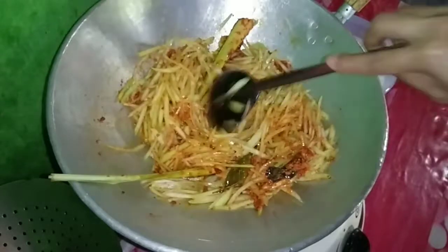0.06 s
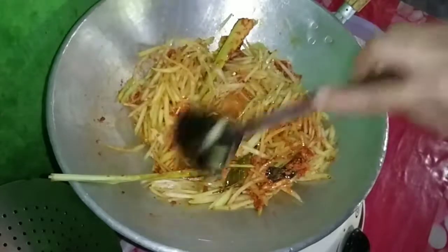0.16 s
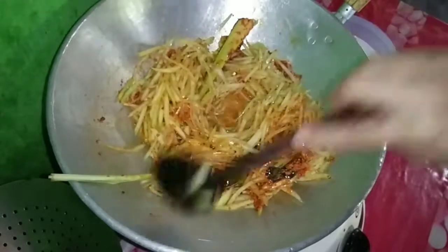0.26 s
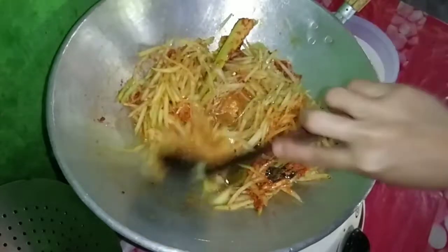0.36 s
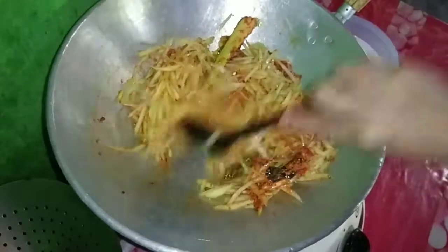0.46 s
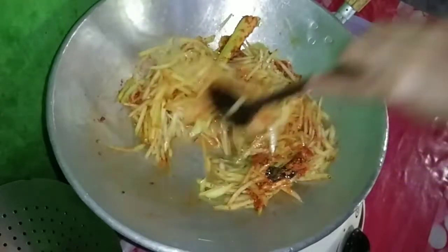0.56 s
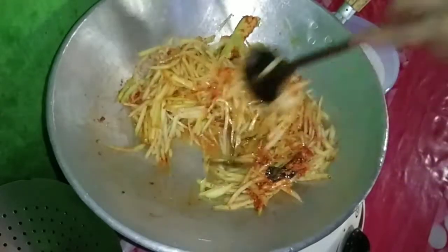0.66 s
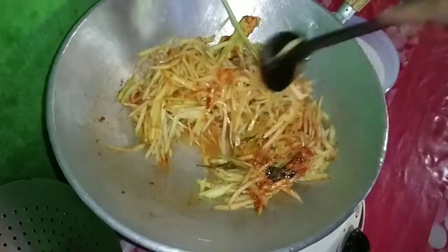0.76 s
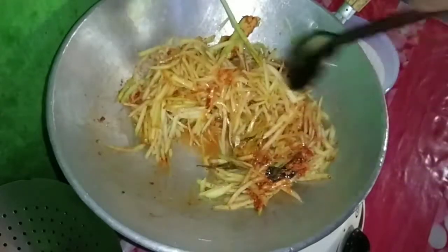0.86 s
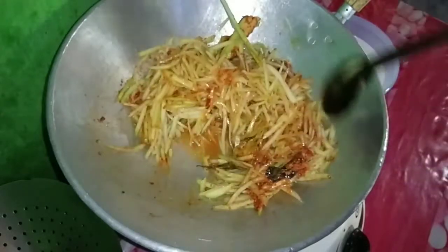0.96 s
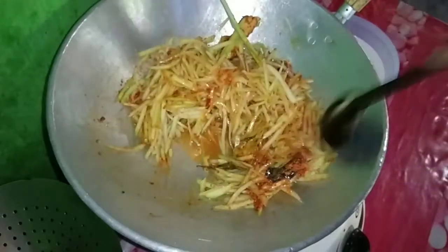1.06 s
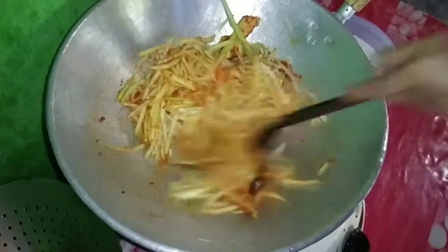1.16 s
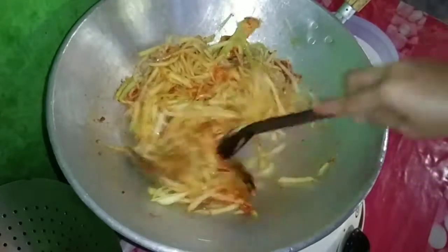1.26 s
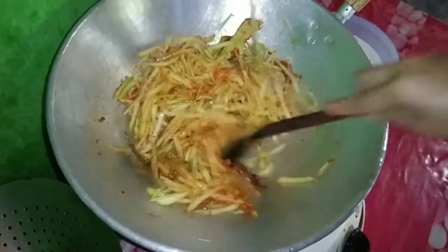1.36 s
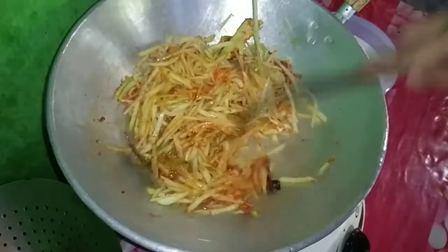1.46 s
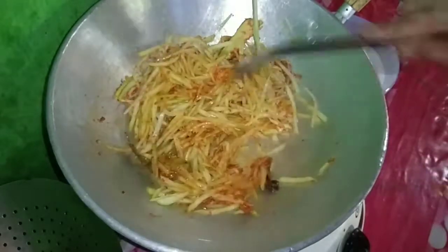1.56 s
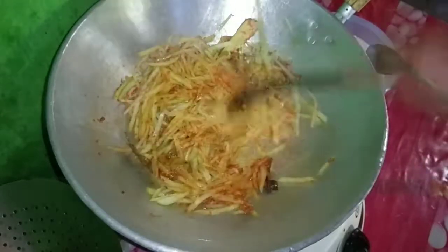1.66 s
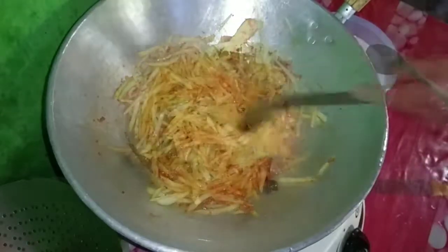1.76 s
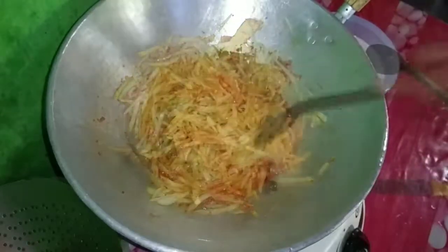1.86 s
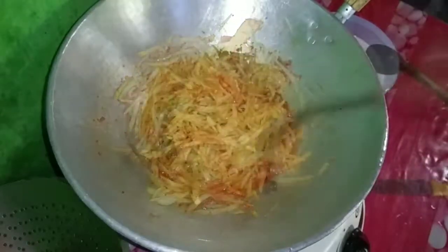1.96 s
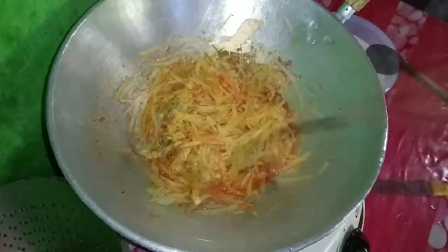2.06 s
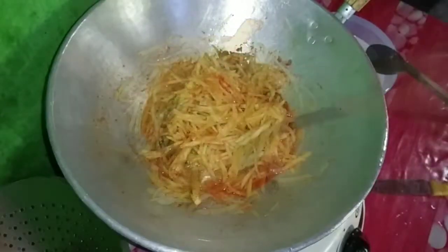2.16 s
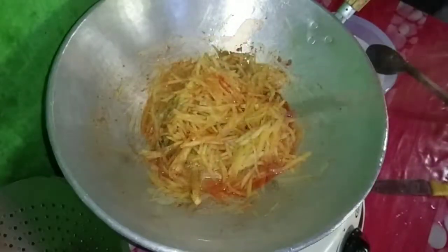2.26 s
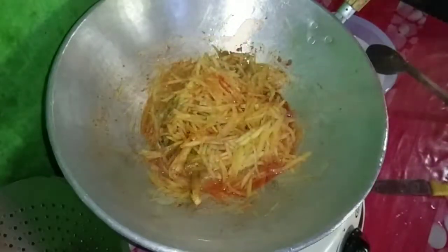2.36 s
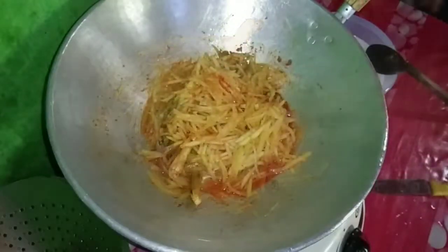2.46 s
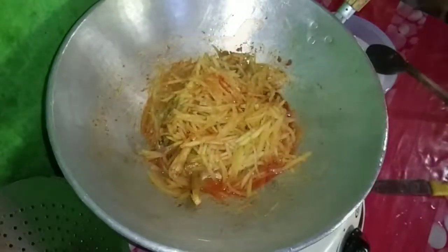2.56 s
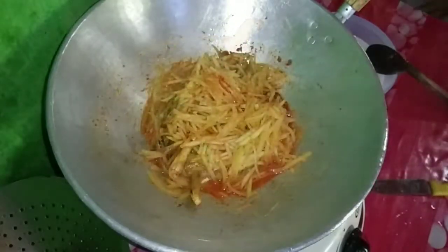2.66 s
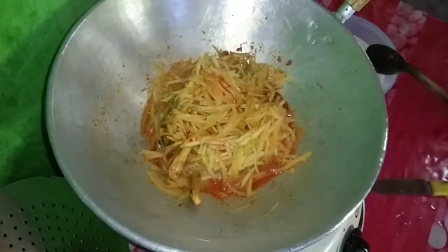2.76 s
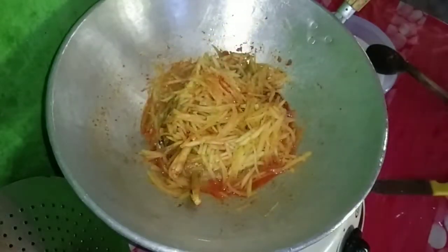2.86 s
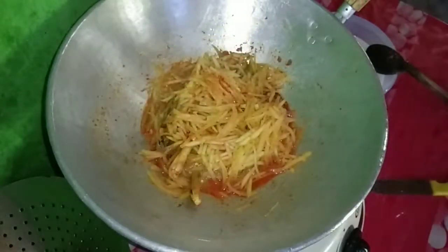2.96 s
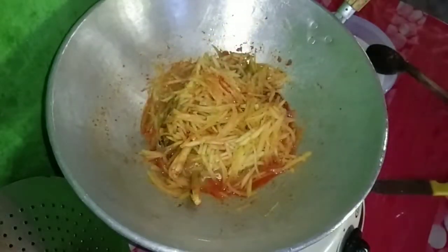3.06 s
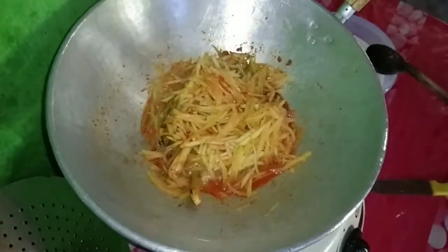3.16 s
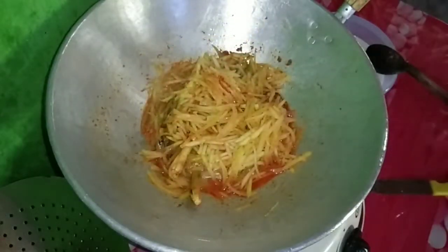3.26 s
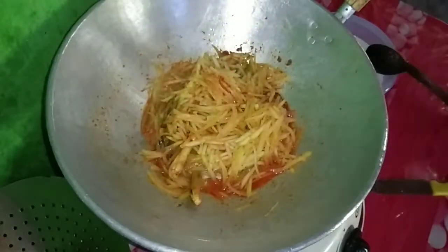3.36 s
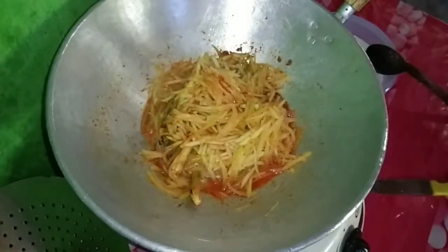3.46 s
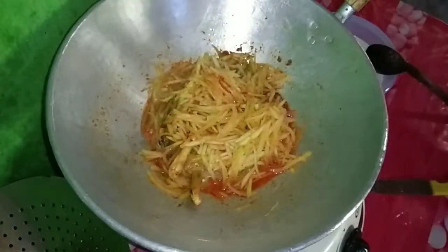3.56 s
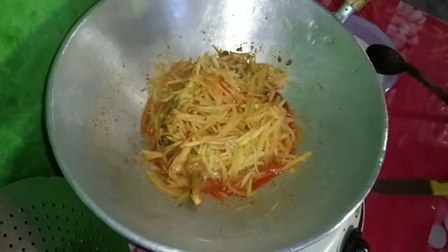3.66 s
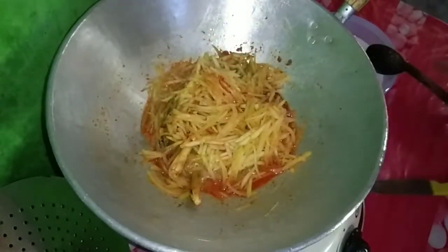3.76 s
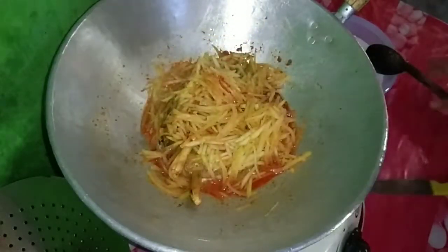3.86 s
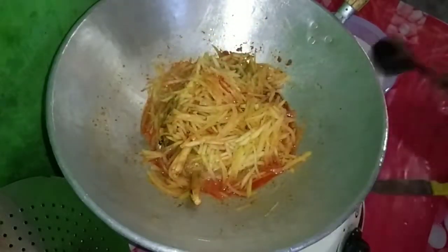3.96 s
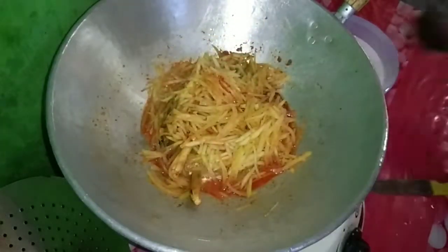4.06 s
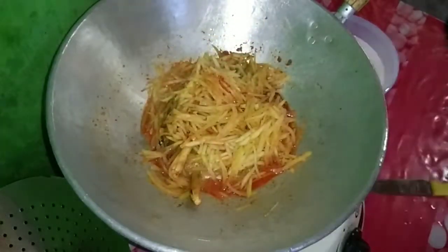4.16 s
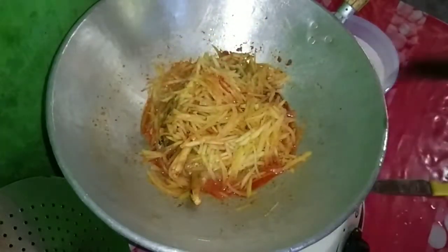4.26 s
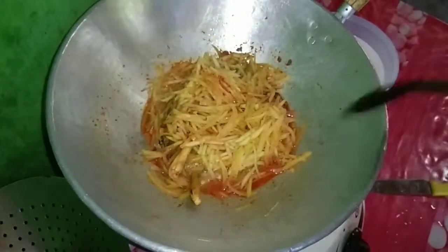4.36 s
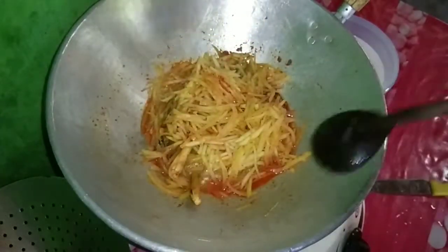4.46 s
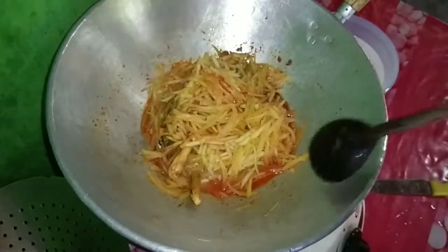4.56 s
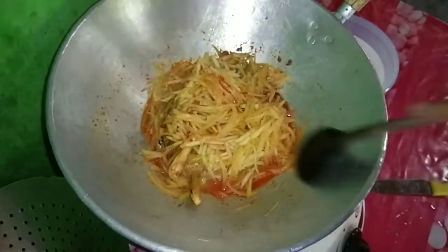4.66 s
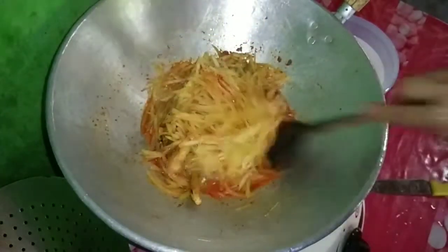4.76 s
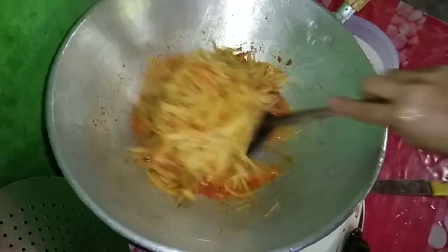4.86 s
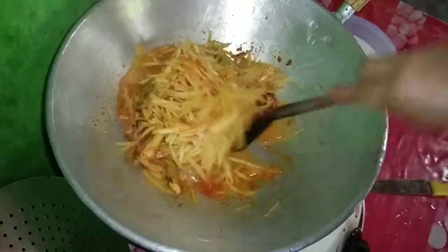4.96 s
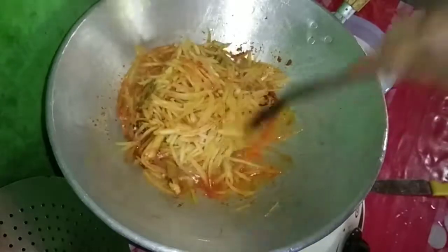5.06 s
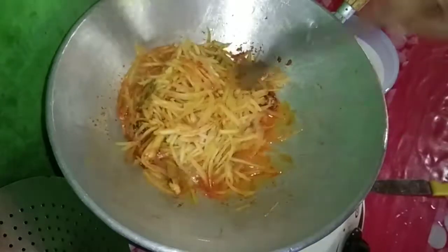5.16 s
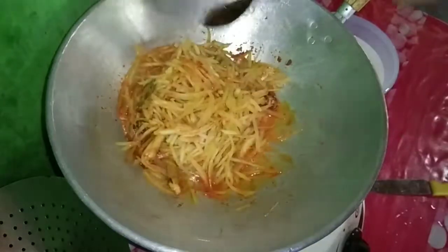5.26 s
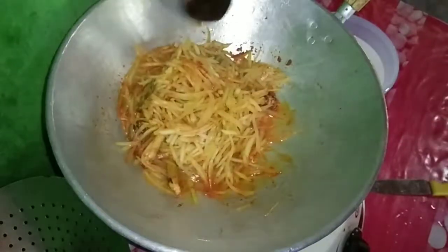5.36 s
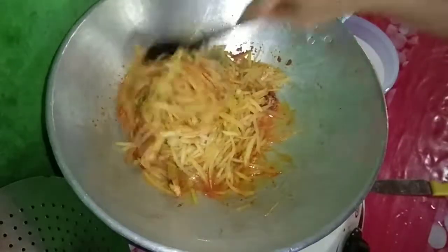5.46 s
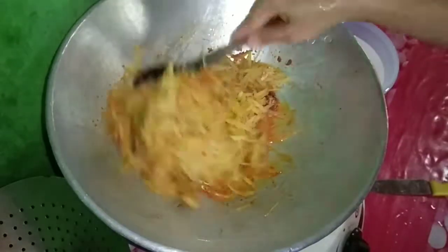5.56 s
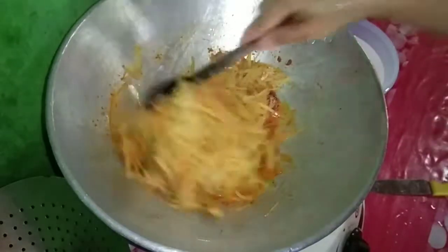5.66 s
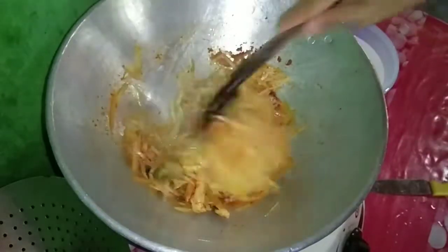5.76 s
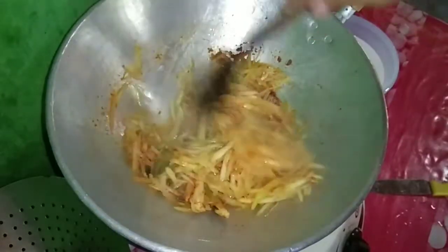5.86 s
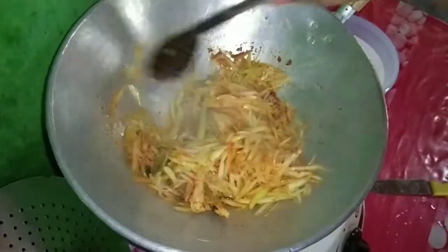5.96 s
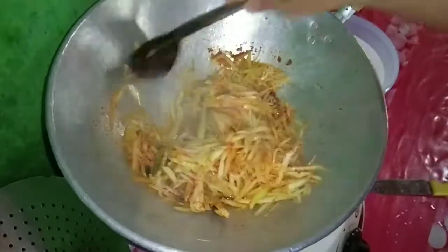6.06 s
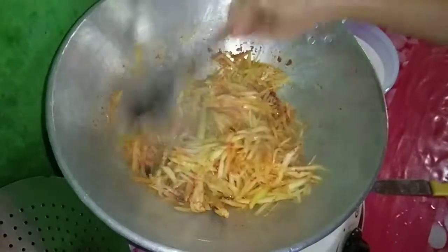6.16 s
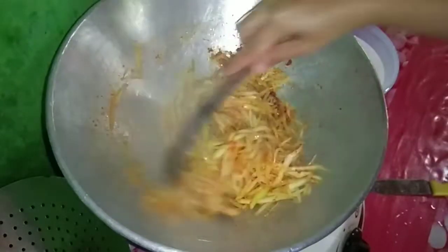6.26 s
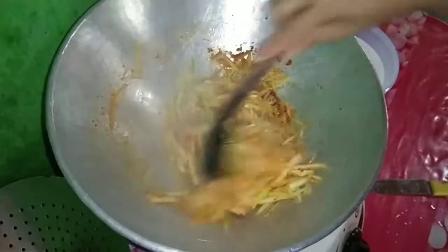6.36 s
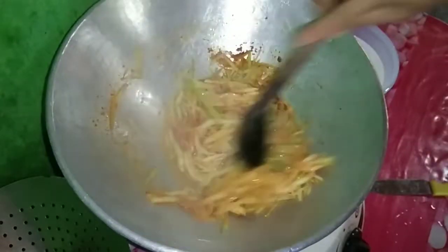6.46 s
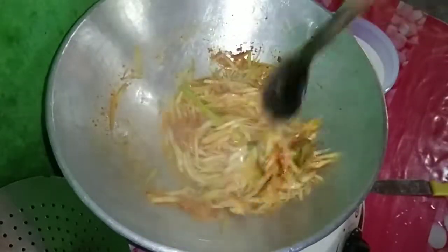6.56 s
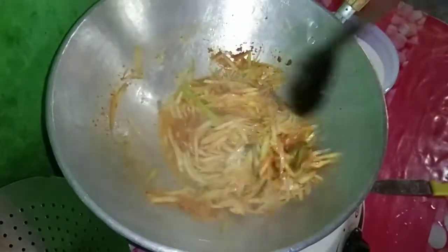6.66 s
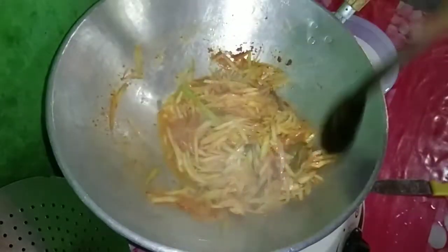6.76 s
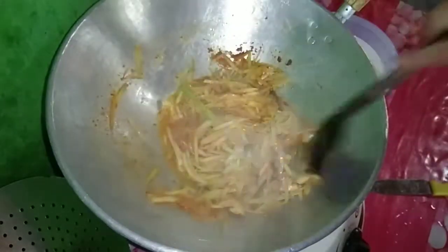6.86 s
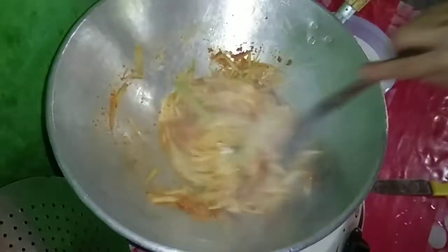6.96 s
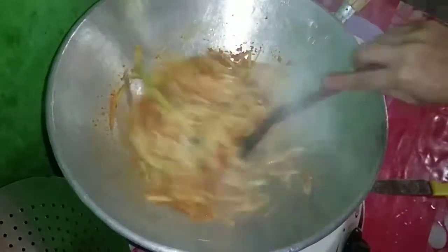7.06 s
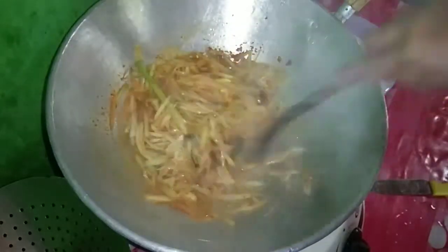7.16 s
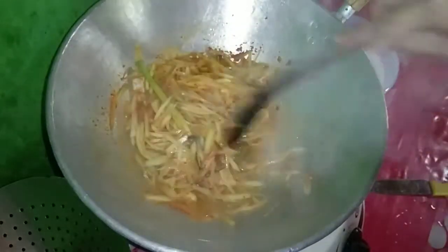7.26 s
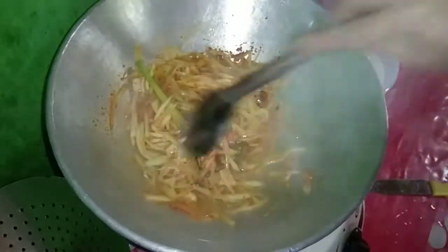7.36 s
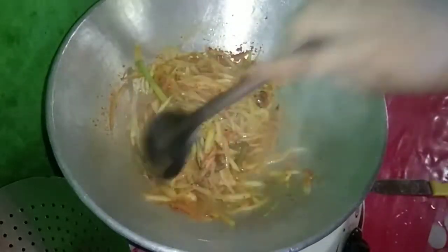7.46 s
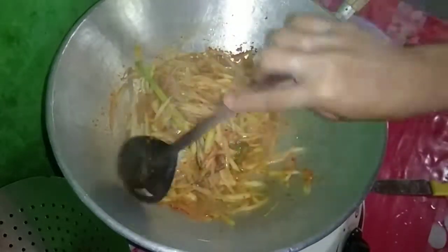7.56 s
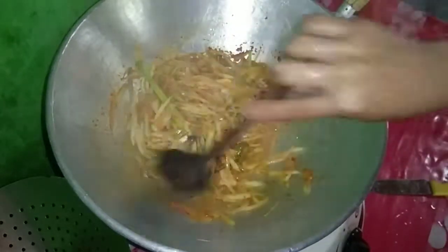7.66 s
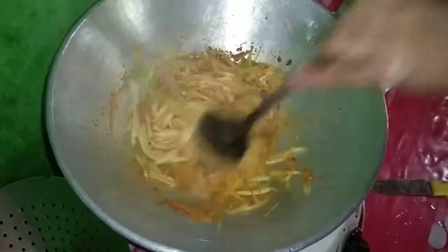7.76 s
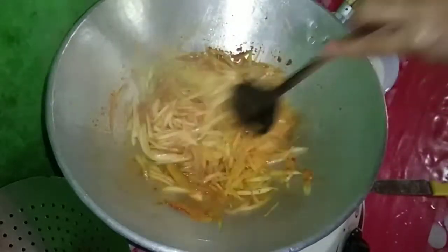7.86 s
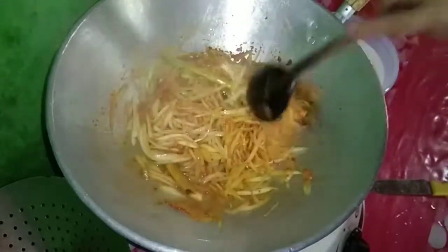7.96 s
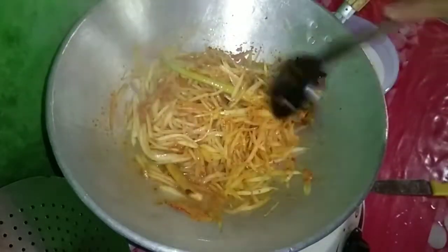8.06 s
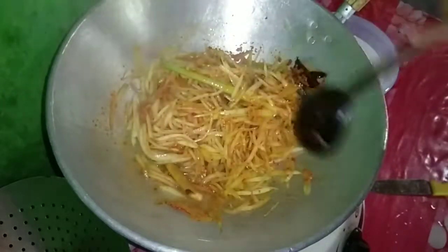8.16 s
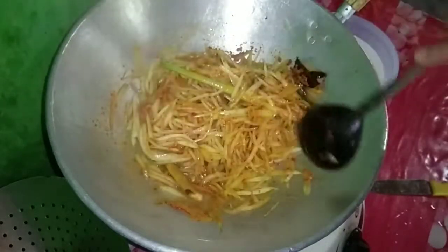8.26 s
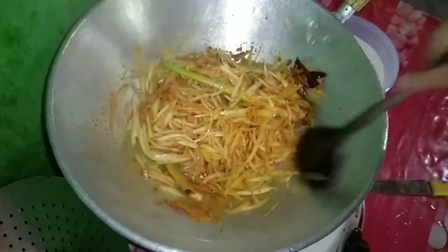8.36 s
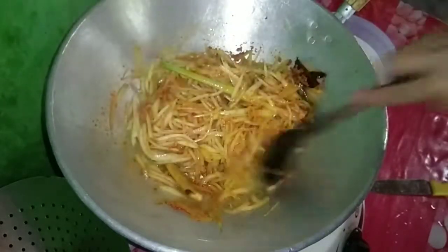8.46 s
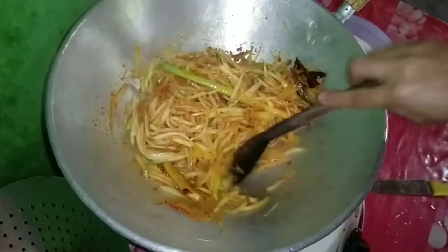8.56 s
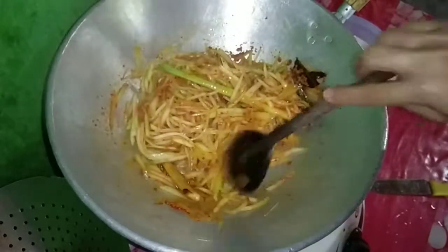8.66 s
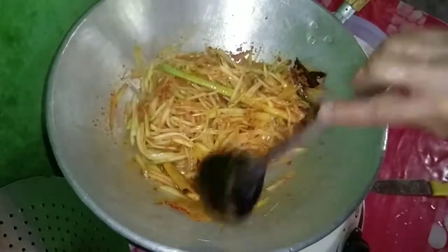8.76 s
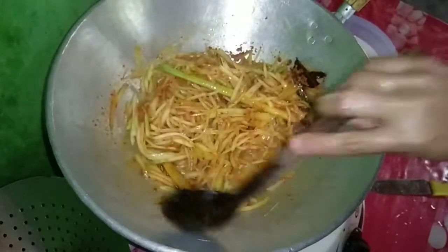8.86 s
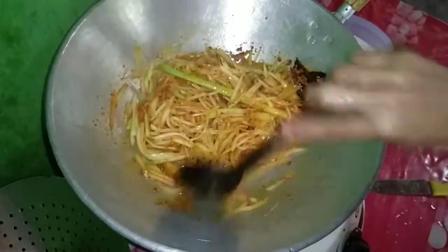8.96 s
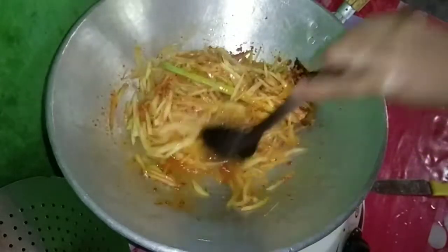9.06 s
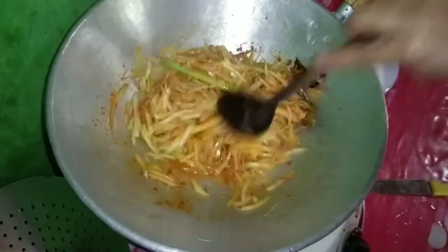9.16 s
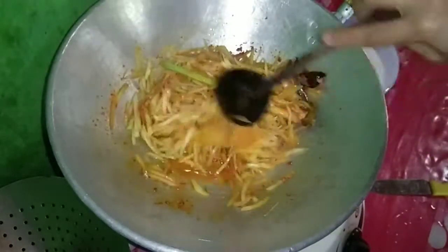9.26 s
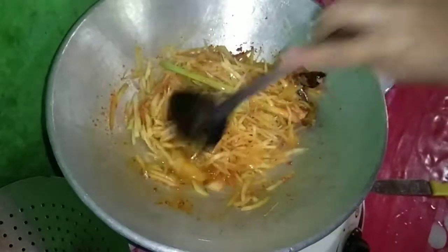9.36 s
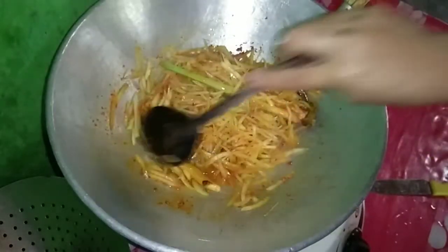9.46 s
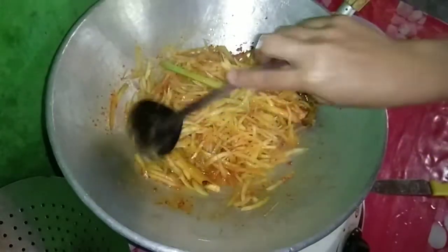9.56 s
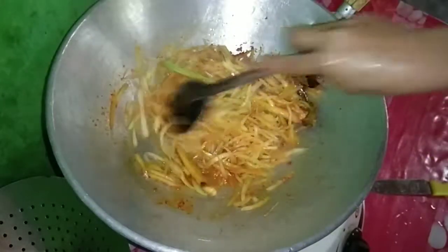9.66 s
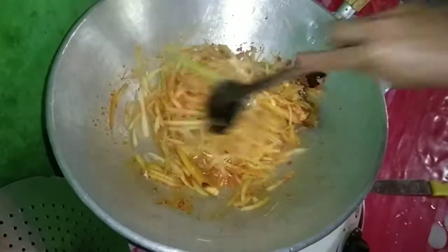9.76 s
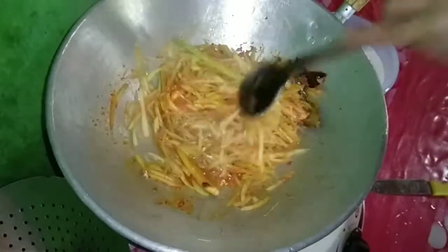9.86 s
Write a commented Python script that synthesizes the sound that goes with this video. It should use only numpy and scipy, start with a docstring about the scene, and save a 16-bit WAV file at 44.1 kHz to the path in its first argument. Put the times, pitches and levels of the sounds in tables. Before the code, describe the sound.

Food sizzles in a thin metal wok as a ladle knocks and scrapes, while crickets chirp steadily outside over faint traffic rumble.

```python
"""Sauce sizzles in a thin metal wok over far traffic, while crickets outside chirp in step. A ladle soon knocks
and scrapes: contacts ring the wok's modes, strokes excite them with stuttering noise. The sizzle, dense clicks
and noise, fades out by 3 s; noise puffs then pop. Chirps are short falling tones. A broad noise rushes over the
rumble, swelling near 5 s as the ladle scrapes through food. From 5.8 s an idling motor hums as three sine
multiples of its firing rate."""
import sys
import numpy as np
from scipy import signal
from scipy.fft import rfft, irfft, next_fast_len
from scipy.io import wavfile
from scipy.ndimage import uniform_filter1d, map_coordinates

SR = 44100
rng = np.random.default_rng(int(sys.argv[2]) if len(sys.argv) > 2 else 0)


def inscribe(sig):
    """Save sig as 16-bit PCM at rate SR to the path in sys.argv[1].

    A 1-D sig is mono; a 2-D sig holds one channel per row.
    Samples are clipped to [-1, 1] before scaling.
    """
    pcm = np.round(np.clip(np.atleast_2d(sig).T, -1, 1) * 32767)
    wavfile.write(sys.argv[1], SR, pcm.astype(np.int16))


N = 436149
TIME = np.arange(N) / SR


def amp(db):
    """Gain of a level in dB."""
    return 10 ** (np.asarray(db) / 20)


def unit(x):
    """x at rms 1."""
    return x / np.sqrt(np.mean(x ** 2) + 1e-20)


def curves(rows, outside=-150):
    """One value per sample for each column after the time; `outside` beyond the rows."""
    s, *cols = np.transpose(rows)
    return np.array([np.interp(TIME, s, c, outside, outside) for c in cols])


def wobble(rate_hz):
    """Smooth random curve, rate_hz knots a second."""
    return map_coordinates(rng.standard_normal(int(N * rate_hz / SR) + 4), [TIME * rate_hz])


def filtered(x, response):
    """x times a response of frequency."""
    m = next_fast_len(N + SR // 2)
    return irfft(rfft(x, m) * response(np.fft.rfftfreq(m, 1 / SR)), m)[..., :N]


def coloured(x, points):
    """x shaped by (frequency [Hz], level [dB]) points on a log axis, at rms 1."""
    f, db = np.transpose(points)
    return unit(filtered(x, lambda hz: amp(np.interp(np.log(hz + 1), np.log(f + 1), db))))


def grainy(per_s, spread_db, smooth):
    """Random clicks of uneven size at rms 1, plus noise at rms `smooth`."""
    hits = rng.random(N) < per_s / SR
    clicks = hits * rng.uniform(-0.79, 1, N) * amp(spread_db * rng.random(N) ** 2)
    return unit(clicks) + smooth * rng.standard_normal(N)


def ringing(modes, damping):
    """Response of resonant modes with alternating signs; damping scales their bandwidths."""
    def response(f):
        total = 0
        for k, (mode_hz, db, t60_s) in enumerate(modes):
            width_hz = damping * np.log(1000) / (np.pi * t60_s)
            resonance = 1j * f * np.sqrt(width_hz) / (mode_hz ** 2 - f * f + 1j * f * width_hz)
            total = total + (-1) ** k * amp(db) * resonance
        return total
    return response


# wok modes: (frequency [Hz], relative level [dB], t60 before damping [s])
WOK_MODES = [(192.7, -4.5, 0.54), (242, -14, 0.59), (333.8, -26.5, 1), (355.4, 1.5, 0.11), (456, -4, 0.089),
             (593.5, -12, 0.55), (663, -19.5, 1), (842, -4.5, 0.33), (1012, -15, 0.086), (1474, -8.5, 0.1),
             (1834, -1, 0.025), (2370, -9, 0.098), (2812, 3.5, 0.07), (2820, 2, 0.11), (2993, 7, 0.084),
             (3180, 4, 0.2), (3365, 0.5, 0.2), (3790, 7.5, 0.11), (3690, 14, 0.029), (4050, -9.5, 0.11),
             (4360, 11.5, 0.019), (4440, -2, 0.21), (4744, 12, 0.035), (5540, -8, 0.18), (5460, 7, 0.044),
             (5945, 15.5, 0.024), (7420, 6, 0.081)]
# sauce: (time [s], sizzle level [dB], fine spray level before trim [dB])
SAUCE_LEVELS = [(0.0, -43.5, -54.5), (1.08, -39.5, -56), (2.07, -52, -60.5), (3.0, -63.5, -83)]
# sizzle spectrum: (frequency [Hz], relative density [dB per Hz])
SIZZLE_SPECTRUM = [(180, -27), (300, -6.5), (609, -62), (725, -79), (887, -8), (1290, -4), (1780, -13),
                   (1990, -5.5), (3120, -6.5), (3660, 1), (4050, -2.5), (4820, -1.5), (5560, -3.5),
                   (6810, 4.5), (9500, -17.5), (12400, -35.5), (20900, -120)]
# fine spray spectrum: (frequency [Hz], relative density [dB per Hz])
SPRAY_SPECTRUM = [(4710, -48), (8000, -24), (8820, -17), (11400, -19.5), (14900, -13), (15600, -7)]


def sauce():
    """Dense tiny bursts of steam; the hot wok rings along and colours them."""
    sizzle_db, spray_db = curves(SAUCE_LEVELS)
    bursts = amp(0.5 * wobble(12)) * grainy(per_s=1200.0, spread_db=8.0, smooth=1.8)
    high_modes = [m for m in WOK_MODES if m[0] > 2500]
    shell = unit(filtered(bursts, ringing(high_modes, damping=2.0)))
    sizzle = amp(sizzle_db) * (coloured(bursts, SIZZLE_SPECTRUM) + 0.055 * shell)
    spray = amp(spray_db - 0.5) * coloured(bursts, SPRAY_SPECTRUM)
    return sizzle + spray


# background: (time [s], rumble level [dB], broad rush level before boost [dB])
BACKGROUND_LEVELS = [(0, -52, -63), (.58, -52, -53.5), (1.1, -54.5, -59), (1.68, -58, -64.5),
                     (2.6, -64.5, -62), (2.92, -63, -60), (3.58, -57, -55), (4.46, -57.5, -56),
                     (5.0, -55.5, -49.5), (5.92, -59, -59), (6.7, -60, -59), (7.1, -58.5, -57.5),
                     (7.5, -58.5, -60), (7.85, -58, -57.5), (9.0, -57, -57), (9.89, -57.5, -56.5)]
# rumble spectrum: (frequency [Hz], relative density [dB per Hz])
RUMBLE_SPECTRUM = [(12, -51), (20, -32), (40, -11), (97, 0.5), (145, 4.5), (198, -0.5), (222, -7),
                   (323, -7), (400, -9), (520, -11), (880, -120)]
# broad rush spectrum: (frequency [Hz], relative density [dB per Hz])
RUSH_SPECTRUM = [(120, -34), (200, -18.5), (263, -11), (642, -7.5), (771, -8.5), (1110, -6), (1720, -11),
                 (2660, -11.5), (3830, -8.5), (5500, -9.5), (7400, -3.5), (8550, -26), (11900, -38),
                 (15600, -33.5)]


def background():
    """Far traffic rumbles; a broad noise with faint sauce ticks rushes, swelling near 5 s."""
    rumble_db, rush_db = curves(BACKGROUND_LEVELS)
    rumble_noise = coloured(rng.standard_normal(N), RUMBLE_SPECTRUM)
    rumble = amp(rumble_db + 0.25 * wobble(2.68)) * rumble_noise
    ticking_noise = grainy(per_s=70.0, spread_db=6.0, smooth=4.0)
    # the swell near 5 s: the ladle scrapes through food
    rush = amp(rush_db + 6 + 0.8 * wobble(6)) * coloured(ticking_noise, RUSH_SPECTRUM)
    return rumble + rush


def wing_stroke(tune):
    """One wing stroke: a short tone of falling pitch with a faint octave."""
    t = np.arange(SR // 80) / SR
    phase = 2 * np.pi * np.cumsum(6780 * tune + 1000 * (0.5 - t / 0.00878)) / SR
    swell = np.sin(np.pi * np.clip(t / 0.01, 0, 1)) ** 1.2
    return swell * (np.sin(phase) + amp(-44) * np.sin(2 * phase))


# two cricket groups, the second taking over from the first; chirps evenly spaced between rows:
# (time [s], chirp number, level before spread and offsets [dB], nearest singer above the others [dB])
CRICKET_GROUPS = [
    [(0.029, 0, -41, 9), (1.02, 8, -39, -4), (1.53, 12, -48, 0), (2.04, 16, -48, 0), (2.51, 20, -43, -10),
     (3.1, 25, -40.5, 3.5), (3.58, 29, -36, 5), (3.937, 32, -37.5, 3), (4.157, 34, -41, 5.5),
     (4.627, 38, -40, 12), (4.857, 40, -62, -5)],
    [(4.715, 0, -44.5, 16), (5.24, 4, -37.5, 7), (5.777, 8, -40.5, 10), (6.08, 10, -32, -1.5),
     (6.478, 13, -37.5, 7.5), (6.865, 16, -34, -3), (7.246, 19, -38, 9), (7.767, 23, -34, -9),
     (8.048, 25, -37.5, 3.5), (8.543, 29, -37.5, 9), (9.047, 33, -36, 2), (9.34, 35, -33.5, -12),
     (9.466, 36, -40, 10), (9.835, 39, -36, 6.5)],
]
CHIRP_SPREAD_DB = 1.5


def chirps():
    """Every chirp of both groups: (time [s], level [dB], nearest singer's lead [dB])."""
    rows = []
    for group in CRICKET_GROUPS:
        s, number, db, lead_db = np.transpose(group)
        number = np.round(number)
        for k in range(int(number[-1]) + 1):
            rows.append([np.interp(k, number, column) for column in (s, db, lead_db)])
    rows = np.array(rows)
    rows[:, 1] += CHIRP_SPREAD_DB * rng.standard_normal(len(rows))
    return rows


# far chorus spectrum: (frequency [Hz], relative density [dB per Hz])
CHORUS_SPECTRUM = [(3060, -44), (5200, -45), (5870, -29), (6310, 12.5), (6670, 13.5), (7040, 5.5),
                   (8230, -49), (9500, -22), (12400, -57), (20900, -120)]
WING_GAP_S, SINGER_LAG_S = 0.0195, 0.007  # stroke to stroke; scale of the others' random lag
CHIRP_SAG = 0.0088  # fractional pitch fall per stroke
CHOIR_HUM_DB = -8  # gain on the half-second mean of the swell


def crickets(count=3):
    """Each chirp is six wing strokes from each of several singers; far ones blur into a swell."""
    near, rows = np.zeros(N + SR), chirps()
    for s, db, lead_db in rows:
        for singer in range(count):
            shift, tune, loud = rng.standard_normal(3)
            if singer == 0:  # nearest
                bend_db, first_db, lift_db, jitter_db, detune, lag_s = 1.2, 9.0, lead_db, 0.8, 0.012, 0
            else:
                bend_db, first_db, lift_db, jitter_db, detune = 0.8, 5.0, 0, 1.4, 0.0246
                lag_s = SINGER_LAG_S * abs(shift) * singer
            for k in range(-2, 4):
                fall_db = -bend_db * (k + 0.5) ** 2 - first_db * (k < -1)
                start_s = s - 0.0045 + WING_GAP_S * k + lag_s
                level_db = db - 6.0 + lift_db + 0.96 * loud + fall_db
                level_db += jitter_db * rng.standard_normal()
                stroke = amp(level_db) * wing_stroke(1 + detune * tune - CHIRP_SAG * k)
                near[max(round(start_s * SR), 0):][:len(stroke)] += stroke
    coarse_s, swell = TIME[::50], 0
    for s, db, _ in rows:
        width_s = np.where(coarse_s < s, 0.018, 0.045)
        swell = swell + amp(db) * np.exp(-((coarse_s - s) / width_s) ** 2)
    swell = np.interp(TIME, coarse_s, swell)
    blur_gain = amp(-15) * swell + amp(CHOIR_HUM_DB) * uniform_filter1d(swell, SR // 2)
    blur = coloured(rng.standard_normal(N), CHORUS_SPECTRUM) * blur_gain
    # echoes among leaves and walls
    tail = rng.standard_normal(SR // 8) * amp(-60 * np.arange(SR // 8) / SR / 0.076)
    echoes = signal.fftconvolve(near, tail / np.linalg.norm(tail))[:N]
    return near[:N] + 0.3 * echoes + blur


# ladle contacts: (time [s], reference level [dB], bowl thud level before offsets [dB],
# favoured low pitch [Hz], favoured high pitch [Hz], hollowness before offset [dB])
CONTACTS = [(0.3831, -11.5, -29, 360, 3100, -28), (0.4273, -29, -41.5, 210, 4950, -28),
            (1.409, -42, -71, 848, 4170, -4.5), (2.583, -33.5, -47, 363, 4200, -19),
            (4.7397, -11, -41.5, 470, 3060, -23), (5.4113, -12.5, -30.5, 355, 4640, -21),
            (5.4237, -29, -39.5, 190, 3730, -38), (5.9179, -29.5, -70, 172, 3080, -28),
            (6.17, -47, -43, 188, 3690, -15), (7.216, -34, -48.5, 380, 3990, -15),
            (7.263, -42, -61, 438, 3010, -15), (7.642, -32, -31.5, 357, 3410, -18),
            (7.7191, -27.5, -44, 369, 3010, -39), (8.021, -39, -62, 361, 4262, -24),
            (8.433, -16, -38.5, 356, 3280, -15), (8.443, -36.5, -38.5, 600, 3030, 0),
            (8.9365, -18, -34, 373, 4970, -23), (8.9396, -22, -47, 197, 3590, -14.5),
            (9.0339, -21.5, -48, 175, 3870, -41)]
EDGE_DB = -21.5  # treble edge re contact level


def knocks():
    """Each contact cracks, rings the high modes and thuds in the low ones."""
    out, t = np.zeros(N + SR), np.arange(SR // 2) / SR
    hz, mode_db, t60_s = np.transpose(WOK_MODES)[:, :, None]
    crack_band = signal.butter(2, [3400, 7800], "band", fs=SR)
    edge_band = signal.butter(2, 8000, "high", fs=SR)
    for s, db, thud_db, low_hz, high_hz, hollow_db in CONTACTS:
        chance = rng.standard_normal((len(WOK_MODES), 3))
        # the struck spot favours the modes near one pitch
        low = thud_db + 5.5 - 7 * np.log2(hz / low_hz) ** 2
        high = db - 17.5 - 3.3 * np.log2(hz / high_hz) ** 2
        middle = db + hollow_db + 11  # a flat blow also wakes the modes in between
        strength_db = np.select([hz < 1000, hz < 2500], [low, middle], high)
        strength_db = strength_db + mode_db + 1.6 * chance[:, :1]
        # most energy leaves fast into the food, a weaker part rings on
        fade = amp(-60 * t / (0.25 * t60_s)) + 0.17 * amp(-60 * t / t60_s)
        onset = 1 - np.exp(-1.5 * hz * t)
        detuned_hz = hz * (1 + 0.0066 * chance[:, 1:2])
        swing = np.sign(chance[:, 2:]) * np.sin(2 * np.pi * detuned_hz * t)
        ring = np.sum(amp(strength_db) * fade * onset * swing, axis=0)
        noise = rng.standard_normal(len(t)) * (1 - np.exp(-t / 0.0011))
        crack_fade = amp(-60 * t / 0.0035) + 0.23 * amp(-60 * t / 0.029)
        crack = amp(db + 6.5) * crack_fade * signal.lfilter(*crack_band, noise)
        edge = amp(db + EDGE_DB - 60 * t / 0.029) * signal.lfilter(*edge_band, noise)
        out[round(s * SR):][:len(t)] += ring + crack + edge
    return out[:N]


SCRAPE_BANDS_HZ, FOCUS_DB = [2140, 3200, 4700, 7100], 13.5  # loss one octave from the favoured pitch


def focus(hz):
    """Level in dB of each scrape band when the edge favours one pitch."""
    return -FOCUS_DB * np.log2(np.array(SCRAPE_BANDS_HZ) / hz) ** 2


# ladle strokes: (time of hardest push [s], rise [s], fall [s], scrape level before focus [dB],
# load on the bowl [dB], thin hiss level [dB], favoured pitch [Hz])
LADLE_STROKES = [(.438, 0.015, 0.021, -31, -63, -50, 4800), (1.24, .018, 0.026, -35, -73, -44, 2720),
                 (1.275, 0.054, .06, -33, -53.5, -42, 3540), (2.62, .02, 0.058, -51, -61, -80, 3600),
                 (5.04, 0.12, 0.12, -44, -69, -48, 4800), (5.491, 0.034, 0.08, -39, -61, -49, 3920),
                 (5.57, 0.025, 0.013, -43, -59, -64, 4400), (5.63, 0.062, 0.047, -55, -54, -57, 3500),
                 (5.89, 0.023, 0.092, -50, -72, -82, 3700), (6.245, 0.043, 0.11, -46, -54.5, -56, 4500),
                 (7.11, .1, .08, -49.5, -56.5, -69, 2980), (7.25, .03, 0.051, -74, -61, -82, 3500),
                 (7.73, 0.043, 0.03, -35.5, -43.5, -57, 3850), (7.82, 0.092, 0.076, -57, -54.5, -80, 3500),
                 (8.03, .03, 0.034, -57, -56, -80, 3700), (8.55, 0.054, 0.16, -50.5, -55, -80, 3800),
                 (9.035, 0.036, 0.033, -29.5, -46, -42, 4530), (9.12, .04, 0.095, -52, -57, -78, 4000)]
PUSH_DROP_DB, PUSH_BEND = 16, 2  # loss one rise or fall from the hardest push; roundness of the top
# post-contact skid: scrape and hiss re contact level, load re thud level
SKID_DB, SKID_HISS_DB, SKID_LOAD_DB, SKID_HZ = -17.5, -26, -13.5, 4200
SKID_FADE_DB_PER_S, SKID_LOAD_FADE_DB_PER_S = 224, 195


def pressure():
    """Gains of load, hiss and scrape bands: strokes swell and fade, contacts leave a dying skid."""
    gain = np.zeros((2 + len(SCRAPE_BANDS_HZ), N))
    for s, rise_s, fall_s, scrape_db, load_db, hiss_db, hz in LADLE_STROKES:
        away = np.abs(TIME - s) / np.where(TIME < s, rise_s, fall_s)
        peak_db = np.r_[load_db, hiss_db, scrape_db + focus(hz)]
        gain += amp(peak_db)[:, None] * amp(-PUSH_DROP_DB * away ** PUSH_BEND)
    for s, db, thud_db, *_ in CONTACTS:
        start, t = round(s * SR), TIME[:SR // 2]
        bright_db = np.r_[SKID_HISS_DB, SKID_DB + focus(SKID_HZ)][:, None] + db - SKID_FADE_DB_PER_S * t
        skid_load_db = thud_db + SKID_LOAD_DB - SKID_LOAD_FADE_DB_PER_S * t
        skid_db = np.vstack([skid_load_db, bright_db])
        gain[:, start:start + len(t)] += amp(skid_db) * (1 - np.exp(-t / 0.015))
    return gain


# steel rubbing on metal: (frequency [Hz], relative density [dB per Hz])
RASP_SPECTRUM = [(700, -3), (1200, -10), (2200, -1), (2900, -0.5), (4000, -1.5), (5300, -5), (7400, -1.5),
                 (8500, -27), (11000, -51), (18000, -120)]
# thin hiss: (frequency [Hz], relative density [dB per Hz])
SHEEN_SPECTRUM = [(4410, -23.5), (7500, -2), (7800, -9), (9270, -20.5), (12200, -30), (15600, -33)]


def strokes():
    """The ladle's edge stutters over the metal; the grains excite the wok, noise its low modes."""
    load, hiss, *bands = pressure()
    judder = amp(2.4 * wobble(130))
    stutter = judder * grainy(per_s=1200.0, spread_db=8.5, smooth=1.0)
    high_modes = [m for m in WOK_MODES if m[0] > 2500]
    low_modes = [m for m in WOK_MODES if m[0] < 700]
    shell = unit(filtered(stutter, ringing(high_modes, damping=0.9)))
    rasp = unit(coloured(stutter, RASP_SPECTRUM) + 0.47 * shell)
    push_noise = amp(0.56 * wobble(25)) * rng.standard_normal(N)
    bowl = unit(filtered(push_noise, ringing(low_modes, damping=1.52)))
    # overlapping bands that add up to the whole
    centres, picks = np.log(SCRAPE_BANDS_HZ), np.eye(len(bands))

    def split(hz):
        return np.array([np.interp(np.log(hz + 1), centres, pick) for pick in picks])

    scrape = np.sum(bands * filtered(rasp, split), axis=0)
    sheen = coloured(1.2 * unit(stutter) + rng.standard_normal(N), SHEEN_SPECTRUM)
    return scrape + hiss * sheen + load * bowl


# clearest pops of the simmering sauce: (time [s], level before crest allowance [dB])
CLEAR_POPS = [(4.9482, -28), (5.62, -41), (5.6697, -31.5), (5.7533, -37), (5.8436, -39), (7.8231, -32.5),
              (7.8794, -40), (7.9794, -37), (8.095, -38), (8.1663, -48), (8.8293, -43)]
# pop spectrum: (frequency [Hz], relative density [dB per Hz])
POP_SPECTRUM = [(150, -30), (600, -9), (2500, 10.5), (6000, -9.5), (9000, -5), (15600, -36)]
POPS_PER_S, SMALL_POP_DB, POP_SPREAD_DB = 35, -52, 10  # fainter pops, at random
POP_T60_S, POP_CREST_DB = 0.013, 7  # crest: peak of a pop's noise over its rms
SIMMER_S = 3.2  # small pops begin once the sizzle has faded


def pops():
    """Single bubbles burst in the sauce: a puff of noise a few milliseconds long."""
    hits = (rng.random(N) < POPS_PER_S / SR) * (TIME > SIMMER_S)
    bursts = hits * amp(SMALL_POP_DB + POP_SPREAD_DB * rng.random(N) ** 2)
    for s, db in CLEAR_POPS:
        bursts[round(s * SR)] = amp(db - POP_CREST_DB)
    t = TIME[:SR // 40]
    puff = amp(-60 * t / POP_T60_S) * (1 - np.exp(-t / 0.00049))
    envelope = signal.fftconvolve(bursts, puff)[:N]
    return envelope * coloured(rng.standard_normal(N), POP_SPECTRUM)


# motor: (time [s], firing rate [Hz], 5th multiple rms level [dB], 6th multiple rms level [dB])
MOTOR_TRACK = [(5.8, 26.21, -68, -82), (6.3, 26.5, -61, -90), (6.85, 27, -61, -68),
               (7.36, 27.6, -60.5, -61), (7.6, 27.4, -59, -58), (8.2, 27.8, -59, -92),
               (8.42, 27.74, -59, -81), (8.55, 27.83, -53, -67), (9.06, 28.26, -51.5, -76),
               (9.24, 28.47, -68, -75), (9.4, 28.2, -56, -60), (9.7, 28.96, -56, -78),
               (9.89, 28.8, -69, -70)]
FOURTH_DB = -7  # 4th multiple re 5th


def motor():
    """Low multiples of an idling motor's firing rate, as sines on one running phase."""
    rate_hz, fifth_db, sixth_db = curves(MOTOR_TRACK)
    phase = 2 * np.pi * np.cumsum(np.abs(rate_hz)) / SR
    levels_db = [fifth_db + FOURTH_DB, fifth_db, sixth_db]
    return sum(np.sqrt(2) * amp(db) * np.sin(k * phase) for k, db in enumerate(levels_db, start=4))


def scene():
    """Sum of all sources, copied to both channels."""
    mono = sauce() + background() + crickets() + knocks() + strokes() + pops() + motor()
    return np.array([mono, mono])


TOP_HZ = 15560


def record(dry):
    """Band limit: nothing is kept from TOP_HZ up."""
    return filtered(dry, lambda hz: hz < TOP_HZ)


dry = scene()
out = record(dry)
inscribe(out)
```